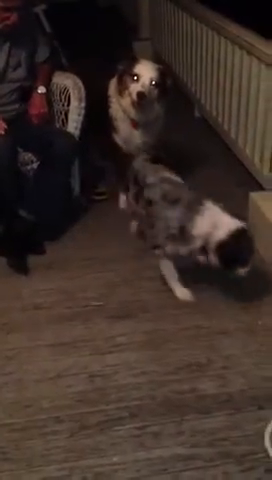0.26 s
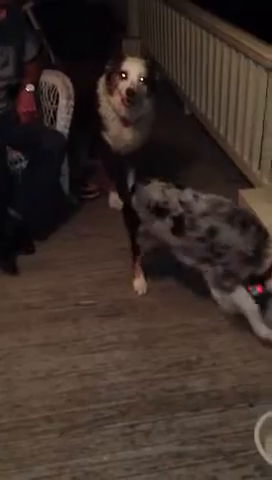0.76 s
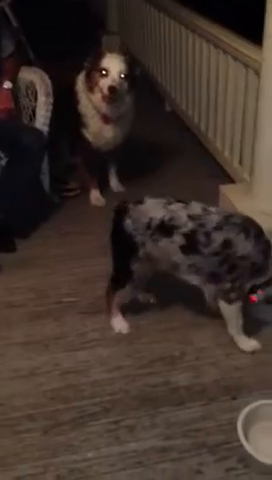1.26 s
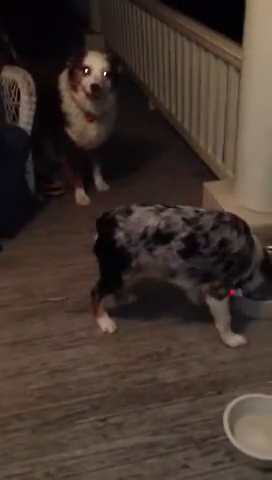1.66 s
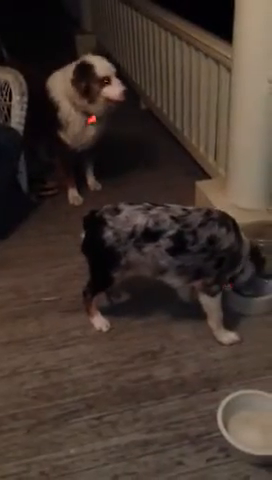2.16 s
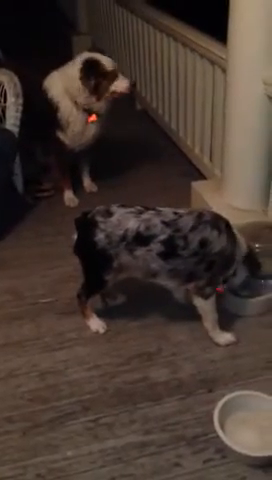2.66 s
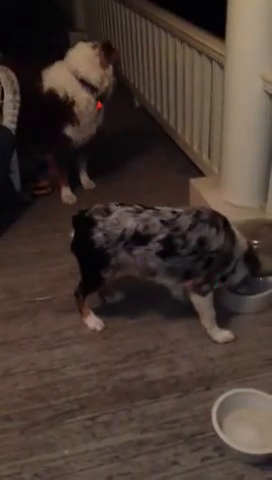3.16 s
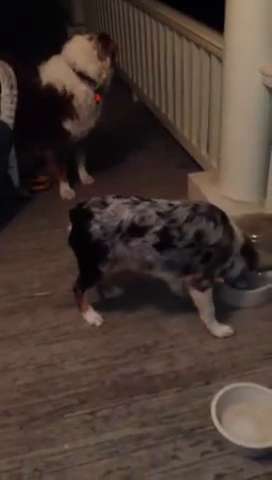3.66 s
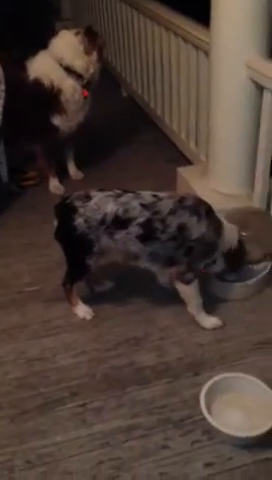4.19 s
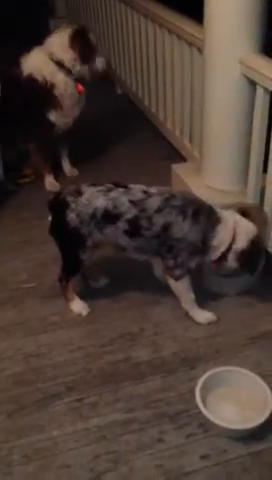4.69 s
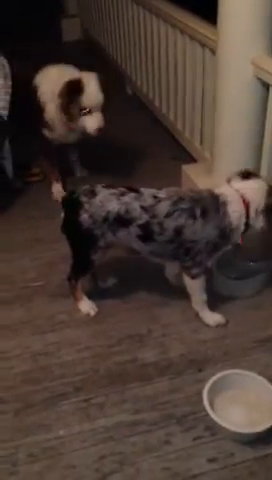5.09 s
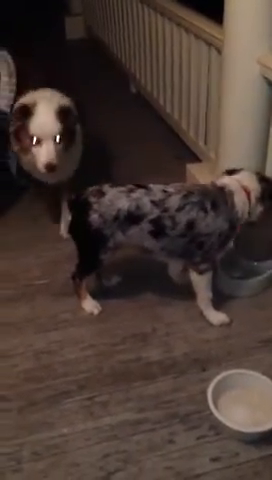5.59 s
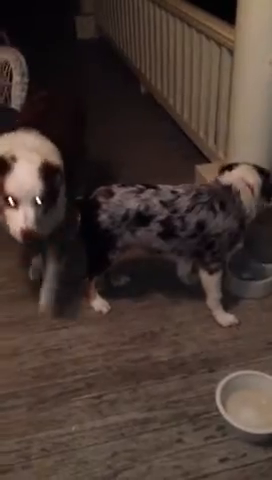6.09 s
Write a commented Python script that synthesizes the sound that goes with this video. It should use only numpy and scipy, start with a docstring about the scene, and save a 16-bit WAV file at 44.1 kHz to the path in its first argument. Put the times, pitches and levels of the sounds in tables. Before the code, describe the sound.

Distant crickets chirr throughout over a low outdoor rumble, and a high insect rasp swells now and then. Nearer the microphone, a young dog crosses wooden porch boards during the first 1.3 seconds, pads thumping and claws clicking, busiest around 0.7 to 0.8 seconds. A few crisp cracks of food sound among the steps. At about 1.9 seconds the dog bumps its bowl with a hollow knock, followed by lighter knocks. It crunches in short, irregular snaps until about 5.2 seconds, sharpest at 3.2, and a piece of food clacks against the bowl at 3.4. A few more steps come around 4.2 seconds. At 4.5 there is one wet smack of the jaws and one tiny tink of a collar tag on the bowl. From 5.3 to about 6.3 seconds a second dog walks past with soft scuffs, a couple of claw taps and a faint brush of fur.

```python
"""A wooden porch at night, one microphone, both channels alike. Far off, crickets chirr with their wings over a
low rumble, and a high insect rasp swells now and then. Nearer, a young dog steps across the boards, its pads
and claws ringing the planks; it bumps its bowl and cracks food between its teeth, with one clack of food, one
wet smack of the jaws and one tink of its collar tag on the bowl. Its paws scuff now and then, and its coat
brushes past."""
import sys
import numpy as np
from scipy import signal
from scipy.fft import rfft, irfft, next_fast_len
from scipy.io import wavfile
from scipy.ndimage import map_coordinates

SR = 44100
rng = np.random.default_rng(int(sys.argv[2]) if len(sys.argv) > 2 else 0)


def inscribe(sig):
    """Save sig as 16-bit PCM at rate SR to the path in sys.argv[1].

    A 1-D sig is mono; a 2-D sig holds one channel per row.
    Samples are clipped to [-1, 1] before scaling.
    """
    pcm = np.round(np.clip(np.atleast_2d(sig).T, -1, 1) * 32767)
    wavfile.write(sys.argv[1], SR, pcm.astype(np.int16))


N = 279594

# Far crowds of crickets. Each row: pitch in Hz, spread in Hz, level in dB, wing strokes a second,
# waver in dB.
FAR_CRICKETS = [(2030, 88, -70, 13, 1), (2404, 77, -66.5, 33, 2), (2850, 118, -70, 55, 1),
                (4390, 224, -67.5, 43, 1), (5260, 174, -60.5, 57, 0.9), (5618, 140, -62, 95, 0.8)]
# Nearer crickets. Each row: middle in seconds, half length in seconds, pitch in Hz, level in dB.
CRICKET_BOUTS = [(0.038, 0.074, 4440, -65.5), (0.478, 0.11, 4390, -65), (1.086, 0.24, 4690, -66.5),
                 (1.4, .14, 4470, -66.5), (2.184, 0.13, 4420, -63), (2.839, 0.13, 4705, -64),
                 (2.898, 0.17, 4470, -67), (3.92, 0.21, 4390, -65.5), (4.195, 0.22, 4620, -67),
                 (4.385, 0.13, 4380, -64.5), (5.898, 0.64, 4510, -66.5), (6.183, .4, 4700, -69)]
# Swells of the insect rasp. Each row: middle in seconds, half length in seconds, level in dB.
RASP_SWELLS = [(0.05, 0.17, -78.5), (1.02, 0.16, -72), (1.5, 0.14, -79), (2.6, 0.09, -66.5),
               (3.56, 0.12, -68), (4.28, 0.12, -77), (4.86, .13, -67), (5.73, .1, -76), (6.32, 0.095, -73)]
# Spectra of the rasp, the farthest insects and the outdoor rumble.
# Each row: frequency in Hz, relative density in dB.
RASP_SPECTRUM = [(5500, -42), (7000, -7), (8200, 0.5), (9200, -1), (10500, -3), (12500, -14), (15500, -23)]
HAZE_SPECTRUM = [(1200, -30), (2000, -7), (3100, 2.5), (3800, -2), (4900, 1), (5900, 0), (6350, -6.5),
                 (7500, -12.5), (12000, -12), (15500, -14.5)]
RUMBLE_SPECTRUM = [(15, -69), (25, -37), (65, -26), (95, -21.5), (126, -6), (146, -9.5), (168, 1),
                   (199, -7.5), (238, -2.5), (262, -10), (290, -3), (315, -9.5), (347, 1.5), (379, -23),
                   (408, -7.5), (505, -13), (570, -14.5), (600, -10), (640, -14), (800, -12), (920, -16.5),
                   (1800, -19.5), (2340, -70), (3960, -120)]
# A distant hum. Each row: pitch in Hz, spread in Hz, level in dB.
HUM_LINES = [(171, 8.2, -70.5), (359.3, 13.4, -72.5)]

# Food cracking between teeth. Each row: start in seconds, level in dB, brightness in dB per band,
# teeth meeting in dB, pitch of the piece in Hz, level of the piece's ring in dB (played 6 dB lower).
FOOD_SNAPS = [(0.045, -71, 2, -81, 14000, -71), (0.341, -72, -6, -74, 8450, -68),
              (0.3983, -52, 1.5, -72, 9800, -47), (0.405, -58, 1, -65, 9900, -57),
              (0.415, -55, -1, -70, 7000, -64), (0.668, -71, 3, -78, 9300, -70),
              (1.256, -73, -7, -65, 9500, -72), (1.319, -67, -7, -61, 8200, -68),
              (2.173, -72, -1, -59, 9700, -59), (2.478, -59, -5.5, -62, 9600, -68),
              (2.628, -65, -3, -71, 9800, -68), (2.874, -66, 5, -62, 6860, -60),
              (2.977, -74, -5, -72, 8200, -69), (3.033, -68, -5, -60, 9750, -56),
              (3.183, -70, -7, -64, 6950, -55), (3.192, -44, 1, -59.5, 6600, -38),
              (3.276, -73, -3, -76, 8200, -68), (3.3726, -62.5, -1, -60, 12500, -60),
              (3.461, -73, -4, -78, 9000, -70), (3.507, -57.5, -3, -60, 6840, -59),
              (3.645, -65, -15, -63, 6700, -56), (3.707, -59.5, 1, -61, 6600, -59),
              (3.905, -73, -1, -72, 8200, -69), (4.012, -70, -14, -70, 8000, -59),
              (4.429, -70, -1, -72, 7000, -57), (4.923, -67, 0, -77, 9600, -66),
              (5.206, -65.5, 1, -70, 14100, -65)]
# Resonances of a crack. Each row: centre in Hz, width in Hz, gain in dB.
FOOD_RESONANCES = [(2700, 1200, -38), (6130, 430, -2), (9670, 770, 24.5), (14200, 2300, 16)]
# A snap's bands: teeth, crack, splinter, fizz. Each row: lower and upper edge in Hz.
SNAP_BANDS_HZ = [(2200, 3900), (4200, 8000), (8000, 11500), (11500, 15500)]
# Offsets in dB for the crack, splinter and fizz of an ordinary snap.
SNAP_OFFSETS_DB = [3.5, -2.5, -2.5]
# Close echoes off floor and pillar. Each row: delay in seconds, gain in dB.
PORCH_ECHOES = [(.0062, -9.5), (.0088, -10)]

# Paws landing. Each row: start in seconds, pad, joist and claw strengths in dB, skid from 0 to 1,
# factor on the decay times.
PAW_STEPS = [(0.162, -58, -76, -72, 0, 0.67), (0.177, -63, -72, -61.5, 0.9, 0.48),
             (0.194, -68, -61, -72, 0.6, .7), (0.48, -56.5, -68, -68, 0, 0.74),
             (0.685, -54, -57.5, -60.5, 1, 1.1), (0.696, -48.5, -49, -55.5, 0.8, 2.3),
             (0.728, -56, -41, -50, 0.64, 0.67), (0.741, -50, -41, -47.5, 0.77, 0.78),
             (0.759, -56, -42, -52, .6, .5), (0.808, -52.5, -46.5, -51.5, 0.43, 1.1),
             (0.821, -46.5, -51, -63, 0.1, 1.24), (1.188, -59, -53, -47, 0, 0.8),
             (1.198, -56, -52, -68, 0, 0.79), (1.266, -56.5, -59, -62, 0.1, 0.74),
             (4.182, -55, -61, -65, 0.6, 1.2), (4.262, -56, -63, -52, 0, 1),
             (4.273, -47.5, -54, -72, 0, 0.82), (4.477, -57, -65, -72, .2, 1.2),
             (4.622, -61.5, -67, -65, .1, 0.72), (5.861, -64, -61, -57, 0, 1),
             (6.322, -63, -70, -55, 0.2, .9)]
# Main modes of the porch floor. Each row: frequency in Hz, relative level in dB, t60 in seconds.
FLOOR_MODES = [(132, -16, .14), (169.2, 5, 0.18), (185, -0.5, .12), (282, 0.5, 0.22), (303, 0, 0.12),
               (359.5, -3.5, 0.12), (420, -4, 0.11), (505, -21, .086), (630, -6, 0.15), (714, -0.5, 0.11),
               (745, -5, .083), (818, -4, 0.082), (913, -3, .11), (1000, -3, 0.12), (1083, -11, 0.099),
               (1307, -4, .075), (1474, -10, .14), (1690, -12, .11), (1905, -9, 0.083)]
# The dense rest of the floor's modes. Each row: frequency in Hz, relative density in dB.
DECK_SPECTRUM = [(30, -35), (105, -33), (160, -12), (300, -2), (420, -3.5), (700, -1), (820, 1), (1050, -4),
                 (1900, -9), (3000, -3), (5000, -20), (9000, -50)]
# How long those ring. Each row: frequency in Hz, t60 in seconds.
DECK_DECAY = [(150, 0.17), (500, 0.38), (1000, 0.24), (1700, 0.33), (4000, 0.1)]
# A knock's five bands, from thud to sharp edge. Each row: lower and upper edge in Hz.
KNOCK_BANDS_HZ = [(145, 240), (240, 480), (480, 780), (780, 1250), (1250, 2300)]
# Claws striking planks. Each row: start in seconds, note in Hz, its level in dB, overtone level in dB,
# t60 in seconds.
CLAW_TAPS = [(0.18, 1130, -52, -66, 0.045), (0.184, 593, -54, -66, .07), (0.727, 1343, -50, -42.5, 0.076),
             (0.809, 918, -45.5, -60, 0.19), (1.187, 885, -41.5, -49, 0.096),
             (4.2625, 854, -47, -56, 0.069), (4.263, 1285, -50, -70, 0.081), (5.862, 1146, -49, -61, .075),
             (6.322, 1056, -50.5, -66, 0.11), (6.326, 1570, -54, -66, .06)]
# Pads dragging over wood. Each row: middle in seconds, half length in seconds, level in dB.
PAD_DRAGS = [(0.701, 0.011, -50.5), (0.741, 0.011, -45.5), (2.328, 0.013, -55.5), (3.386, 0.015, -57),
             (4.18, 0.014, -58), (5.281, 0.027, -52.5), (5.626, 0.017, -58), (5.874, 0.013, -53),
             (6.03, 0.028, -58.5), (6.113, 0.033, -60), (6.33, 0.0093, -52)]
# Their friction. Each row: frequency in Hz, relative density in dB.
PAD_SPECTRUM = [(150, -37), (400, 12), (1400, 13), (3000, 16), (4000, 10), (7500, -0.5), (11000, -18),
                (16000, -35)]
# The plank under a drag. Each row: pitch in Hz, spread in Hz, level in dB against the friction.
DRAG_RESONANCES = [(1090, 200, -18.5), (2500, 130, -10)]

# The muzzle bumping the bowl. Each row: start in seconds, base knock in dB, rim touch in dB.
BOWL_BUMPS = [(1.894, -34, -40.5), (1.994, -71, -55.5), (2.114, -46.5, -65.5), (2.128, -50, -69),
              (2.168, -56.5, -72), (3.02, -70, -63.5), (3.031, -67, -62.5), (3.372, -66, -68),
              (3.757, -73, -63)]
# The bowl and the plank under it. Each row: frequency in Hz, relative level in dB, t60 in seconds.
BOWL_MODES = [(155.6, -6.5, 0.25), (187.6, -1, 0.22), (289, -2, 0.19), (350, -2, .2), (386, 3.5, 0.31),
              (428, 4.5, 0.11), (465, -9, .16), (510, -7, 0.18), (565, -0.5, .18), (609, -2, 0.28),
              (647, -6, 0.091), (690, 0, 0.19), (779, 0, 0.11), (830, -5, 0.14), (1062, 0, 0.11),
              (1460, -10, .13), (1540, -14, 0.2), (1760, -16, .16), (1890, -15, .15), (2040, 3.5, 0.11)]
# Food, and a collar tag, striking the bowl. Each row: frequency in Hz, level in dB, t60 in seconds.
CLACK_MODES = [(1296, -60, .09), (2640, -50, .08), (3270, -53, 0.092), (4450, -56, .06)]
TAG_MODES = [(13300, -45, 0.097), (14000, -45, 0.076), (6750, -47.5, 0.044)]
# The jaws opening. One row: middle in seconds, half length in seconds, level in dB.
JAW_SMACK = (4.479, 0.017, -57.5)
# The walking dog's coat passing. Each row: middle in seconds, half length in seconds, level in dB.
COAT_BRUSHES = [(5.28, .025, -65), (5.63, .02, -67), (6.11, 0.049, -63)]
# Its hiss. Each row: frequency in Hz, relative density in dB.
COAT_SPECTRUM = [(3500, -25), (6000, 5), (7300, 0), (8500, -4), (11000, -20), (15000, -28)]


def amp(db):
    """Decibels to gain."""
    return 10 ** (np.asarray(db) / 20)


def unit(x):
    """Scale to rms 1."""
    return x / np.sqrt(np.mean(x ** 2) + 1e-20)


def along(points, hz):
    """Read (Hz, value) points on a log frequency axis."""
    freqs, values = np.transpose(points)
    return np.interp(np.log(hz + 1), np.log(freqs + 1), values)


def wobble(rate, size=N):
    """A smooth random curve with rate knots a second."""
    knots = rng.standard_normal(int(size * rate / SR) + 4)
    return map_coordinates(knots, [np.arange(size) * rate / SR])


def filtered(x, response):
    """Pass x through a response given as a function of Hz."""
    m = next_fast_len(x.shape[-1] + 8192)
    return irfft(rfft(x, m) * response(np.fft.rfftfreq(m, 1 / SR)), m)[..., :x.shape[-1]]


def noise(spectrum, size=N):
    """Coloured noise of rms 1."""
    return unit(filtered(rng.standard_normal(size), lambda hz: amp(along(spectrum, hz))))


def narrow(centre, spread, size=N):
    """A narrow band of noise, rms 1, heard as a fuzzy pitch."""
    white = rng.standard_normal(size)
    return unit(filtered(white, lambda hz: np.exp(-((hz - centre) / (2 * spread)) ** 2)))


def tone(hz, waver, size):
    """A slightly unsteady sine of rms 1."""
    pitch = hz * (1 + waver * wobble(200, size))
    return np.sqrt(2) * np.sin(2 * np.pi * np.cumsum(pitch) / SR)


def swells(rows):
    """A gain that rises and falls once for each (middle, half length, dB) row."""
    t = np.arange(N) / SR
    return sum(amp(db) * np.exp(-((t - s) / half) ** 2 / 2) for s, half, db in rows)


def shape_hit(hit, edges, levels, size, skirt_db=22):
    """Bring a hit's bands toward their levels over the first size samples, keeping the attack sharp."""
    bands = [signal.sosfilt(signal.butter(3, edge, 'band', fs=SR, output='sos'), hit) for edge in edges]
    gains = [db - 20 * np.log10(np.std(band[:size])) for band, db in zip(bands, levels)]
    low, high = edges[0][0], edges[-1][1]
    curve = [(low / 4, gains[0] - 2 * skirt_db), (low / 2, gains[0] - skirt_db), (low, gains[0]),
             *zip(np.mean(edges, axis=1), gains), (2 * high, gains[-1] - skirt_db)]
    m = next_fast_len(len(hit), True) * 2
    cepstrum = irfft(np.log(amp(along(curve, np.fft.rfftfreq(m, 1 / SR)))))
    cepstrum[1:m // 2] *= 2  # folding makes the filter causal
    cepstrum[m // 2 + 1:] = 0
    return irfft(rfft(hit, m) * np.exp(rfft(cepstrum)))[:len(hit)]


def add(track, s, sound):
    """Mix a sound into the track at s seconds."""
    span = track[max(round(s * SR), 0):][:len(sound)]
    span += sound[:len(span)]


def trill(hz, spread, strokes, depth, size=N):
    """Ringing wings, pulsed at an unsteady stroke rate and blurred by distance."""
    phase = 2 * np.pi * np.cumsum(strokes * (1 + 0.057 * wobble(5.5, size))) / SR
    return unit(narrow(hz, spread, size) * (1 + depth * np.sin(phase)))


def far_insects():
    """Well off the porch: cricket crowds, one pure tree cricket, a swelling rasp and a haze beyond."""
    crowds = sum(amp(db + waver_db * wobble(11)) * trill(hz, spread, strokes, depth=0.14)
                 for hz, spread, db, strokes, waver_db in FAR_CRICKETS)
    tree_cricket = amp(-72 + 0.49 * wobble(3.7)) * trill(hz=2738, spread=7.3, strokes=35, depth=0.25)
    rasp = (amp(-75) + swells(RASP_SWELLS)) * noise(RASP_SPECTRUM)  # rises out of a steady simmer
    return crowds + tree_cricket + rasp + amp(-61.5) * noise(HAZE_SPECTRUM)


def near_crickets():
    """Closer to the microphone, each cricket fades in, trills on its own pitch and fades out."""
    out, t = np.zeros(N + SR), np.arange(-SR, SR) / SR  # a second to either side of the middle
    for s, half, hz, db in CRICKET_BOUTS:
        song = trill(hz, spread=42, strokes=110, depth=0.2, size=len(t))
        add(out, s, amp(db) * np.exp(-(t / half) ** 2 / 2) * song)
    return out[SR:]


def night_air():
    """Low outdoor rumble with a distant, wavering hum in it."""
    hum = sum(amp(db) * narrow(hz, spread) for hz, spread, db in HUM_LINES)
    return hum + amp(-62.5 + 1.4 * wobble(7.7)) * noise(RUMBLE_SPECTRUM)


def food_response(hz):
    """Cracking food resonates in modes of alternating sign; some of the crack passes straight through."""
    return sum((-1) ** k * amp(db) * 1j * hz * width / (centre ** 2 - hz ** 2 + 1j * hz * width)
               for k, (centre, width, db) in enumerate(FOOD_RESONANCES)) - 0.35


def snap_envelope(t, t60, wash_db, rise_s=0.00081, wash_t60=0.16):
    """A crack grows until the piece gives at t = 0, then dies under a short wash from the porch."""
    growth, after = np.exp(np.minimum(t, 0) / rise_s), np.maximum(t, 0)
    return growth * (amp(-60 * after / t60) + amp(wash_db - 60 * after / wash_t60))


def crunches():
    """Teeth snap brittle food; each piece rings on its own pitch, and close echoes follow."""
    out, t = np.zeros(N), np.arange(-256, 6000) / SR
    attack = 700  # samples over which levels are set
    for s, level_db, brightness, teeth_db, piece_hz, piece_db in FOOD_SNAPS:
        burst = rng.standard_normal(len(t)) * snap_envelope(t, t60=0.0075, wash_db=-17.5)
        colour_db = SNAP_OFFSETS_DB + brightness * np.array([-1, 0, 1])  # harder contact is brighter
        levels = [teeth_db, *(level_db + colour_db)]
        crack = shape_hit(filtered(burst, food_response), SNAP_BANDS_HZ, levels, attack)
        ring = narrow(piece_hz, spread=330, size=len(t)) * snap_envelope(t, t60=0.008, wash_db=-25)
        snap = crack + amp(piece_db - 6) * ring / np.std(ring[:attack])
        for delay, db in [(0, 0), *PORCH_ECHOES]:
            add(out, s + t[0] + delay, amp(db) * snap)
    return out


def knock(modes, levels, deck_db, press, vary_db, sustain=1, contact_s=0.015):
    """One blow rings the modes at random strengths, over the dense ring of the whole floor."""
    t = np.arange(16384) / SR
    hz, level, t60 = np.transpose(modes)[:, :, None]
    strength = amp(level + vary_db * rng.standard_normal(hz.shape)) * rng.choice([-1, 1], hz.shape)
    ring = np.sum(strength * amp(-60 * t / (t60 * sustain)) * np.sin(2 * np.pi * hz * t), axis=0)
    freqs, times, frames = signal.stft(noise(DECK_SPECTRUM, len(t)), SR, nperseg=256)
    decay = amp(-60 * times / (sustain * along(DECK_DECAY, freqs)[:, None]))
    deck = signal.istft(frames * decay, SR, nperseg=256)[1][:len(t)]
    contact = 1 + press * np.exp(-t / contact_s)  # strongest while the blow presses on the wood
    blow = (unit(ring) + amp(deck_db) * unit(deck)) * contact
    return shape_hit(blow, KNOCK_BANDS_HZ, levels, size=1024)


def paw_steps():
    """The pad thuds, the joists answer, the claws tick; a skid adds hollow knock and a sharper edge."""
    out = np.zeros(N)
    for s, pad_db, joist_db, claw_db, skid, sustain in PAW_STEPS:
        hollow_db = (joist_db + claw_db) / 2 - 12 + 13 * skid
        edge_db = claw_db - 4 + 6.5 * skid
        levels = [pad_db, joist_db, hollow_db, claw_db - 2.5, edge_db]
        add(out, s, knock(FLOOR_MODES, levels, deck_db=-2, press=0.49, vary_db=2, sustain=sustain))
    return out


def claw_taps(overtone_ratio=2.12, waver=0.036):
    """A claw rings its plank with a woody note and one overtone, both wavering as the paw presses."""
    out, t = np.zeros(N), np.arange(8000) / SR
    for s, hz, db, overtone_db, t60 in CLAW_TAPS:
        note = amp(db) * tone(hz, waver, len(t))
        overtone = amp(overtone_db) * tone(hz * overtone_ratio, waver, len(t))
        add(out, s, (note + overtone) * amp(-60 * t / t60))
    return out


def paw_scuffs(grit_db=2, grit_per_s=240):
    """Gritty friction swells and fades with each drag of a pad, the plank humming under it."""
    friction = noise(PAD_SPECTRUM)
    plank = sum(amp(db) * narrow(hz, spread) for hz, spread, db in DRAG_RESONANCES)
    grit = amp(grit_db * wobble(grit_per_s))
    return swells(PAD_DRAGS) * unit((friction + plank) * grit)


def bowl_bumps():
    """The nudged bowl knocks with its base, which shakes the plank under it, and taps with its rim."""
    out = np.zeros(N)
    for s, base_db, rim_db in BOWL_BUMPS:
        thud_db, edge_db = base_db - 7.5, rim_db - 4
        hollow_db = (base_db + rim_db) / 2 + 1.8
        levels = [thud_db, base_db, hollow_db, rim_db, edge_db]
        add(out, s, knock(BOWL_MODES, levels, deck_db=-3.5, press=0.77, vary_db=1))
    return out


def food_clack(start_s=3.372):
    """One hard piece of food knocks against the bowl's wall."""
    out, t = np.zeros(N), np.arange(6000) / SR
    for hz, db, t60 in CLACK_MODES:
        add(out, start_s, amp(db - 60 * t / t60) * tone(hz, waver=0.028, size=len(t)))
    return out


def jaw_smack(middle_hz=1650, octaves_per_s=31):
    """A wet smack: the mouth's resonance slides down as the jaws part."""
    t = np.clip(np.arange(N) / SR - JAW_SMACK[0], -0.03, 0.03)
    return swells([JAW_SMACK]) * tone(middle_hz * 2 ** (-octaves_per_s * t), waver=0.09, size=N)


def collar_tag(start_s=4.4798):
    """The metal tag touches the bowl once: a tick of contact, then a tiny ring."""
    out, t = np.zeros(N), np.arange(8000) / SR
    tick = amp(-50 - 60 * t / 0.007) * rng.standard_normal(len(t))
    ring = sum(amp(db - 60 * t / t60) * np.sin(2 * np.pi * hz * t) for hz, db, t60 in TAG_MODES)
    add(out, start_s, tick + ring)
    return out


def coat_brushes():
    """The soft hiss of the dog's coat brushing past."""
    return swells(COAT_BRUSHES) * noise(COAT_SPECTRUM)


def scene():
    """The night beyond the porch and the dogs on it meet at one microphone."""
    night = far_insects() + near_crickets() + night_air()
    feeding = crunches() + bowl_bumps() + food_clack() + jaw_smack() + collar_tag()
    walking = paw_steps() + claw_taps() + paw_scuffs() + coat_brushes()
    mono = night + feeding + walking
    return np.array([mono, mono])


def record(dry, top_hz=15600):
    """The recorder keeps nothing above its band limit."""
    return filtered(dry, lambda hz: hz < top_hz)


dry = scene()
out = record(dry)
inscribe(out)
```